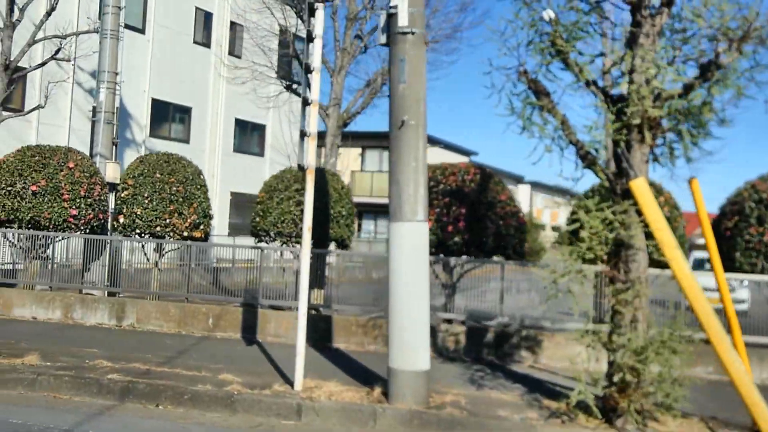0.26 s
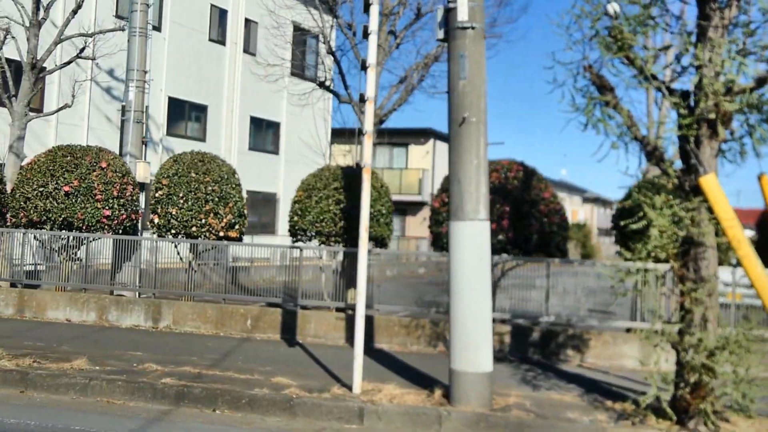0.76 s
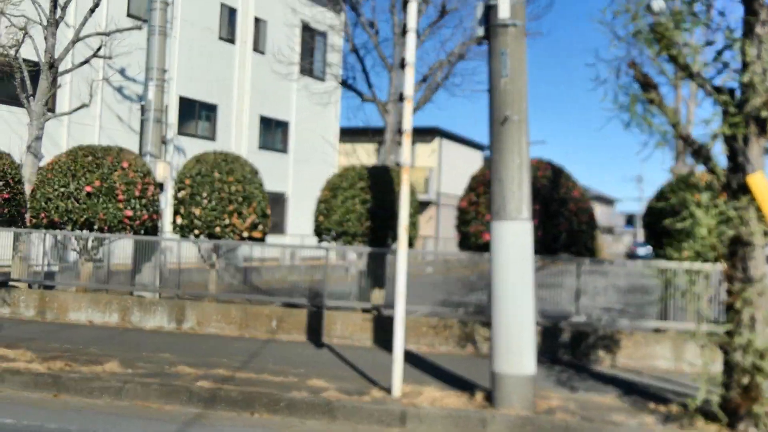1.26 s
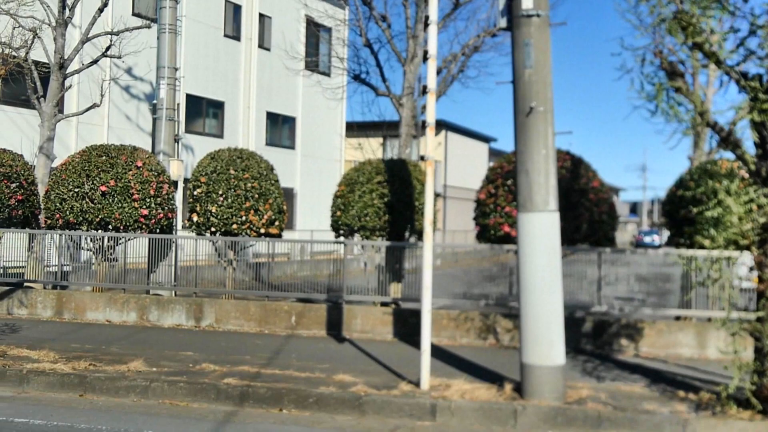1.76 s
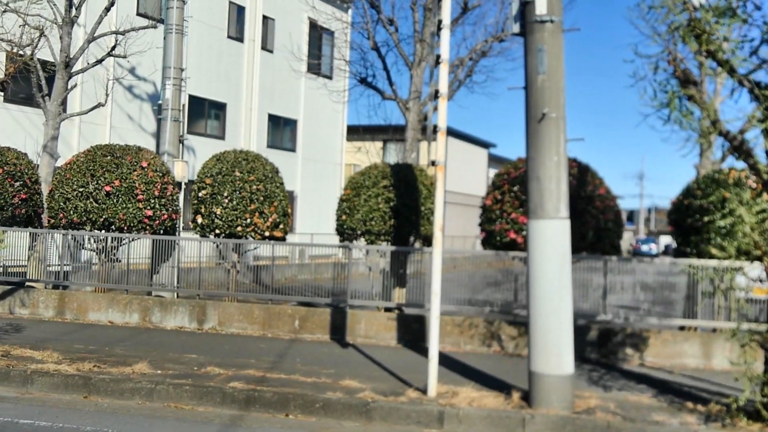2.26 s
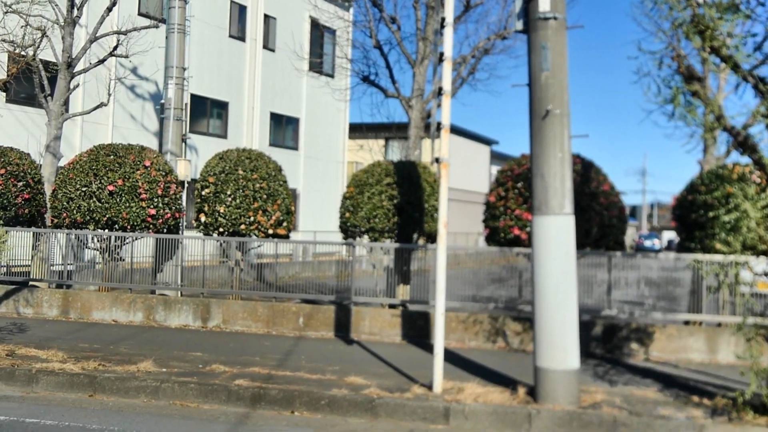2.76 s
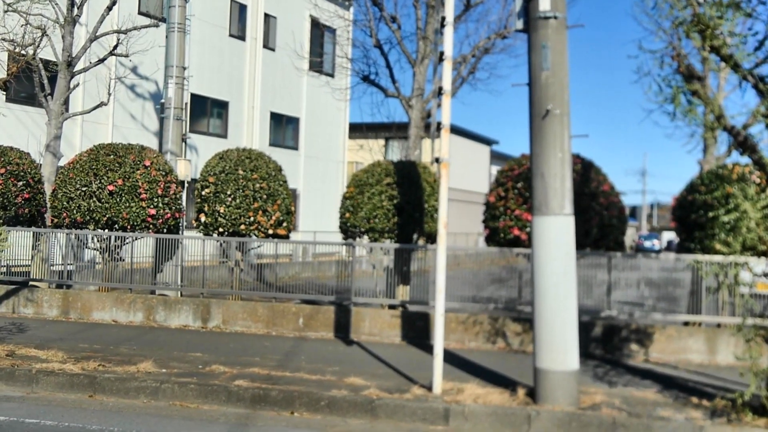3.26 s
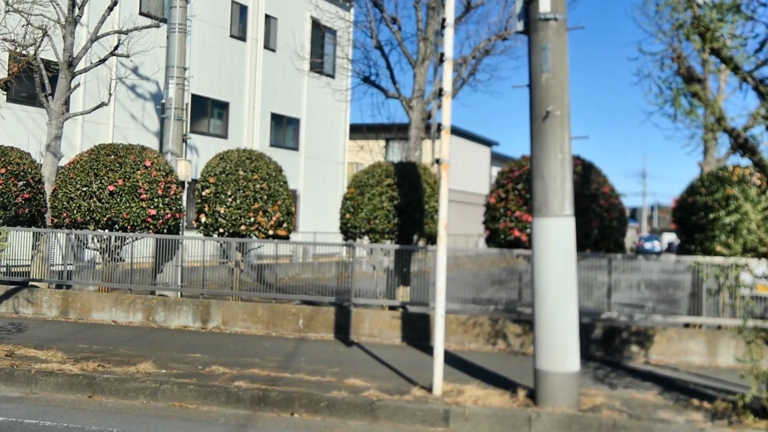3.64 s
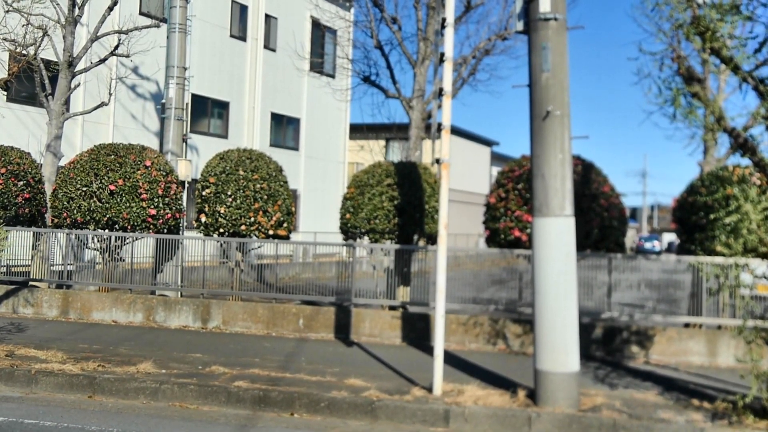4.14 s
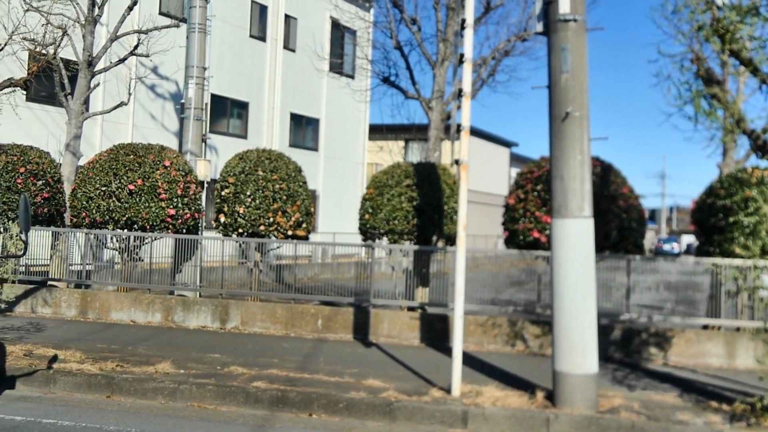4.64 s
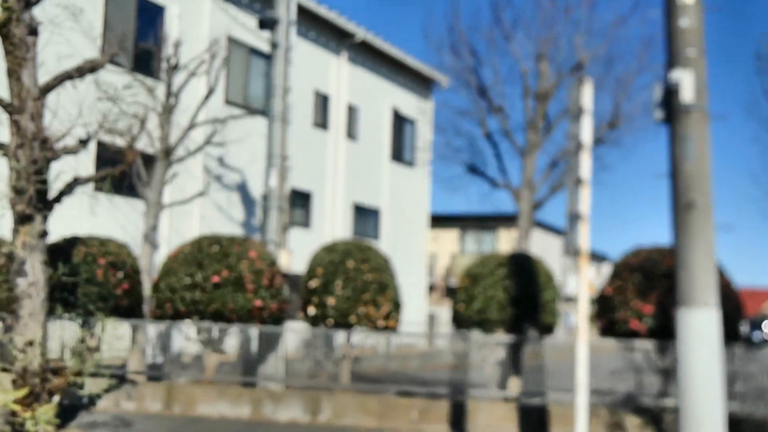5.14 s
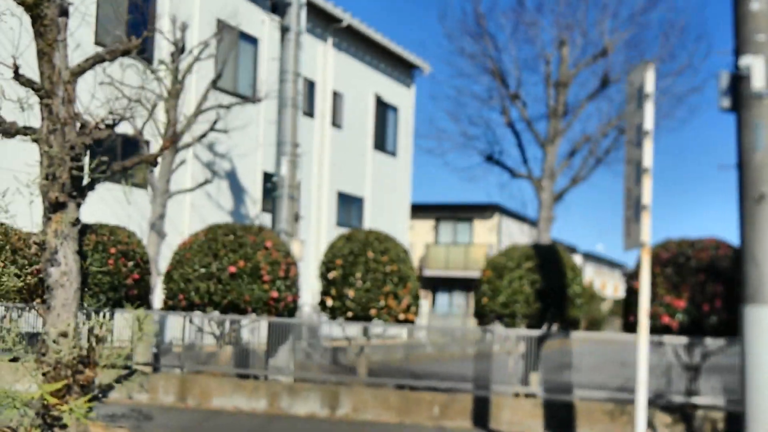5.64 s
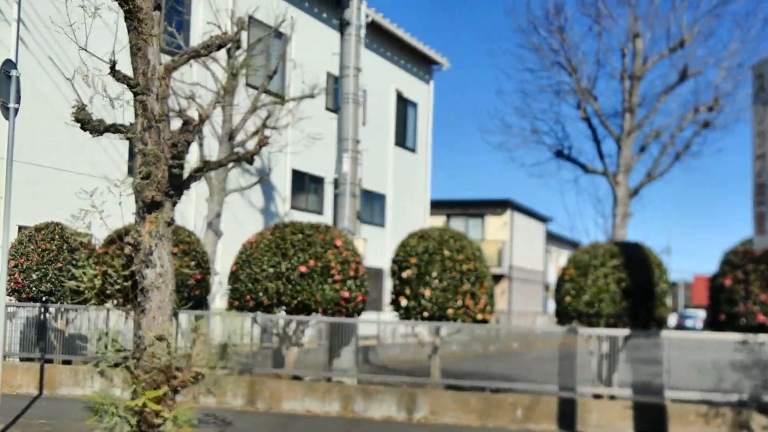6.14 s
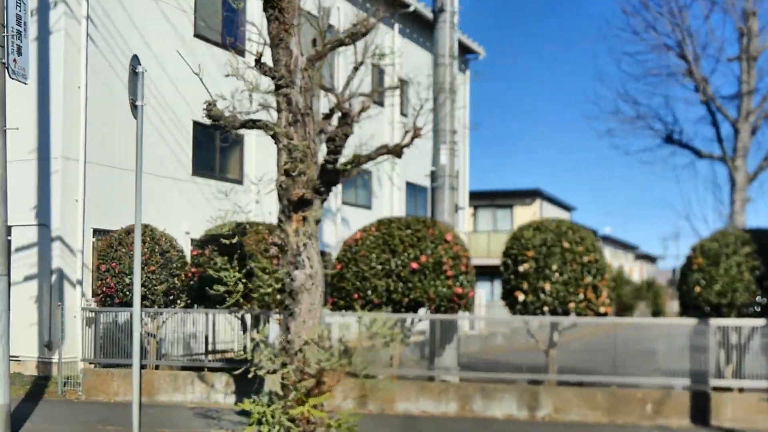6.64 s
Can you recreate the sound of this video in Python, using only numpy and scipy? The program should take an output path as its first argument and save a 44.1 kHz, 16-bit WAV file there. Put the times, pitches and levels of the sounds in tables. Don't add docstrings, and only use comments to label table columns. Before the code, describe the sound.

A bus halts and idles, heard from within: dull, bassy engine hum, soft valve clatter, faint thin air hiss. Brief brake squeaks come early, then paired air puffs, small rattles and passing cars; a stronger puff comes before a longer vehicle roar. A short total silence follows, then a clunk, ticking combustion and a rising, booming diesel pull with brighter hiss, rattles and a late dry snap.

```python
import sys
import numpy as np
from scipy import signal
from scipy.fft import rfft, irfft, next_fast_len
from scipy.io import wavfile

SR = 44100
rng = np.random.default_rng(int(sys.argv[2]) if len(sys.argv) > 2 else 0)


def transcribe(u):
    v = np.clip(np.atleast_2d(u).T, -1, 1)
    q = np.round(v * 32767).astype(np.int16)
    wavfile.write(sys.argv[1], SR, q)


def field_ratio(decibels):
    return 10 ** (np.asarray(decibels, dtype=float) / 20)


N = 303849
T = np.arange(N) / SR
DROPOUT_START_S, DROPOUT_END_S = 5.1712, 5.4167
STANDING = T < (DROPOUT_START_S + DROPOUT_END_S) / 2
LEFT_RIGHT = field_ratio([[0.6], [-0.6]])


def columns(table):
    s, *rest = np.transpose(table)
    return [np.interp(T, s, c) for c in rest]


def on_log_hz(points, hz):
    f, db = np.transpose(points)
    return np.interp(np.log(np.maximum(hz, 1)), np.log(f), db)


def colour(x, points, extra=((1, 0), (2, 0)), size=8192):
    hz = np.arange(size // 2 + 1) * SR / size
    log_gain = np.log(field_ratio(on_log_hz(points, hz) + on_log_hz(extra, hz)))
    cepstrum = irfft(log_gain)
    cepstrum[1:size // 2] *= 2
    cepstrum[size // 2 + 1:] = 0
    response = irfft(np.exp(rfft(cepstrum)))
    return signal.oaconvolve(x, response)[:N]


def band(x, lo_hz, hi_hz):
    sos = signal.butter(2, [lo_hz, hi_hz], "bandpass", fs=SR, output="sos")
    return signal.sosfilt(sos, x)


def walk(rate):
    place = T[::64] * rate + rng.random()
    knots = 1.44 * rng.standard_normal(600)
    k = place.astype(int)
    blend = np.sin(np.pi / 2 * (place - k)) ** 2
    return np.interp(T, T[::64], knots[k] + (knots[k + 1] - knots[k]) * blend)


def swell(at_s, half_s):
    return 1 / (1 + ((T - at_s) / half_s) ** 2) ** 2


# (frequency [Hz], side minus mid [dB])
WIDTH = [(60, -23), (110, -51), (200, -45), (380, -41), (700, -6), (1290, -1.5), (2380, 0), (4400, -1),
         (8120, -1), (15000, -4)]


def wide(points, gate=1):
    lead = 0.33
    common, own = rng.standard_normal((2, N))
    early = irfft(1j * rfft(common, next_fast_len(N)))[:N]
    mid = colour(gate * common, points)
    side = colour(gate * (lead * early + np.sqrt(1 - lead ** 2) * own), points, WIDTH)
    return np.array([mid + side, mid - side]) / np.sqrt(np.mean(mid ** 2))


def cabin(x, t60, wet_db):
    t = np.arange(int(0.3 * SR)) / SR
    tail = rng.standard_normal((2, len(t))) * 1000.0 ** (-t / t60)
    tail *= field_ratio(wet_db) / np.sqrt(np.sum(tail ** 2, axis=1, keepdims=True))
    return x + signal.fftconvolve(x[None], tail, axes=1)[:, :N]


def crank(hz, wander):
    return np.cumsum(hz * (1 + wander * walk(6))) / SR


# (closest approach [s], half length [s], tyre hiss [dB], roar [dB])
PASSING = [
    (.15, 0.17, -84, -55),
    (.42, 0.28, -59.5, -55.5),
    (1.1, 0.29, -62, -58),
    (2.9, 0.074, -63, -56.5),
    (4.33, 0.13, -60.5, -67),
    (4.95, 0.96, -63.5, -50),
]


def passing(column):
    return np.sqrt(sum(field_ratio(2 * row[column]) * swell(*row[:2]) for row in PASSING))


# (frequency [Hz], level [dB per Hz])
ROAR = [(300, -19), (600, -4), (1000, 0), (2500, -9.5), (4500, -18), (8000, -36)]


def traffic_roar():
    return STANDING * passing(column=3) * wide(ROAR, field_ratio(0.67 * walk(11)))


# (frequency [Hz], level [dB per Hz])
HISS = [(2940, -14), (5000, -2.5), (6520, 0.5), (7700, -2.5), (9180, 4.5), (11100, 4), (14600, -8.5),
        (15600, 0.5)]


def leak():
    idle_db, pull_db, refill_db = -68, -57.5, -55.5
    standing = np.hypot(field_ratio(idle_db), passing(column=2))
    refill = field_ratio(2 * refill_db) * np.exp(-np.abs(T - DROPOUT_END_S) / 0.1)
    moving = np.sqrt(field_ratio(2 * pull_db) + refill)
    return np.where(STANDING, standing, moving) * field_ratio(0.59 * walk(8.2)) * wide(HISS)


# (start [s], end [s], start pitch [Hz], end pitch [Hz], level [dB])
WHINES = [
    (0, .6, 1750, 1750, -62),
    (2.38, 2.52, 3130, 3130, -67.5),
    (6.3, 6.7, 1975, 1975, -57),
    (6.18, 6.6, 438, 482, -26),
]


def whines():
    out = 0
    for start, end, start_hz, end_hz, db in WHINES:
        rise = np.sqrt(np.sin(np.pi * np.clip((T - start) / (end - start), 0, 1)))
        hz = np.interp(T, (start, end), (start_hz, end_hz)) * (1 + 0.005 * walk(24))
        out = out + rise * field_ratio(db + 2.5 * walk(27)) * np.sin(2 * np.pi * np.cumsum(hz) / SR)
    return out * LEFT_RIGHT


# (frequency [Hz], level [dB per Hz])
PUFF = [(2650, -22), (4500, 0), (4690, -27), (4990, -6), (5420, -4), (6510, 5), (8050, 0.5), (10200, 5),
        (11600, 0.5), (15600, -12)]
# (time [s], swell [s], hiss [dB], throat [dB], release [dB per s])
PUFFS = [
    (1.79, 0.038, -52, -58, 300),
    (1.855, .012, -62, -58, 260),
    (1.916, 0.017, -46.5, -59, 350),
    (1.96, .022, -47, -52, 300),
    (4.37, 0.032, -41.5, -39.5, 260),
    (6.52, 0.068, -53, -46.5, 138),
]


def puffs():
    attack_s, onset_db = 0.003, -8.5
    turbulence = field_ratio(1.2 * walk(75)) * rng.exponential(size=N) ** 0.53
    hiss = wide(PUFF, turbulence)
    throat = wide([(900, 5.5), (2200, 0), (4800, -4.5), (6500, -14.0)])
    out = 0
    for s, swell_s, hiss_db, throat_db, release_db in PUFFS:
        flow_db = np.interp(T - s, (0, swell_s, swell_s + 1), (onset_db, 0, -release_db))
        flow = np.clip((T - s) / attack_s, 0, 1) * field_ratio(flow_db)
        out = out + flow * (field_ratio(hiss_db) * hiss + field_ratio(throat_db) * throat)
    return out


# (time [s], clack peak [dB], panel ring [dB], low knock [dB], bright tick [dB])
RATTLES = [(0.1034, -56, -59, -29, -70), (0.3815, -39, -58, -30, -62), (0.972, -39, -56, -44, -51),
           (1.7903, -38, -60, -36, -54), (1.8344, -46, -62, -28, -51), (1.8617, -53.5, -47, -25.5, -51),
           (2.3844, -64, -52, -34, -71), (2.8509, -39, -47, -29, -58), (2.8824, -51.5, -47, -29.5, -57),
           (2.9622, -48, -47.5, -25, -52), (2.9946, -58, -60, -28, -64), (3.7392, -52, -62, -45, -59),
           (3.9674, -50, -64, -26, -67), (3.9806, -53, -60, -31, -70), (3.995, -53, -72, -41, -75),
           (5.4924, -34, -40, -20, -45), (6.3579, -49, -53, -28, -57)]
# (time [s], peak [dB], centre [Hz])
SNAPS = [
    (5.4955, -42, 5400),
    (5.4955, -46, 11500),
    (5.702, -47, 5900),
    (6.7325, -37, 4400),
]


def rattles():
    size, panel_hz = 4096, 2320
    out, t = np.zeros(N + size), np.arange(size) / SR
    for s, db, ring_db, low_db, tick_db in RATTLES:
        tap, floor, bright = rng.standard_normal((3, size))
        clack = field_ratio(db - 6.5) * band(tap, 1000, 3000) * 1000.0 ** (-t / 0.07)
        panel = np.sin(2 * np.pi * panel_hz * t) + 6.6 * band(tap, 2150, 2420)
        ring = field_ratio(ring_db - 2) * panel * 1000.0 ** (-t / 0.065)
        thud = field_ratio(low_db + 10.5) * band(floor, 410, 980) * 1000.0 ** (-t / 0.086)
        tick = field_ratio(tick_db + 6.5) * band(bright, 9700, 11200) * 1000.0 ** (-t / 0.07)
        out[int(s * SR):][:size] += clack + ring + thud + tick
    for s, db, hz in SNAPS:
        crack = np.sign(rng.standard_normal(size)) * 1000.0 ** (-t / 0.006)
        out[int(s * SR):][:size] += field_ratio(db + 13) * band(crack, 0.68 * hz, 1.35 * hz)
    return cabin(out[:N], t60=0.22, wet_db=-0.5)


# (time [s], pitch [Hz])
SQUEAL = [(.54, 9630), (.69, 9645), (.75, 9720), (.91, 9740), (1.04, 9685), (1.3, 9570), (1.34, 9530),
          (1.55, 9515), (1.78, 9480)]
# (time [s], length [s], level at start [dB], level at end [dB])
GRABS = [
    (.55, .18, -64, -54),
    (.74, .06, -72, -76),
    (.88, .07, -71, -71),
    (1.025, .165, -63, -59),
    (1.21, .1, -64, -70),
    (1.32, .115, -58, -64),
    (1.46, .045, -68, -67),
    (1.52, .05, -67, -68),
    (1.58, .19, -78, -71),
]


def squeal():
    edge_s = 0.03
    grip = 0
    for s, length_s, start_db, end_db in GRABS:
        end = s + length_s
        edges = np.clip(np.minimum(T - s, end - T) / edge_s + 0.5, 0, 1) ** 2
        grip = grip + edges * field_ratio(np.interp(T, (s, end), (start_db, end_db)))
    hz = columns(SQUEAL)[0] + 6 * walk(60)
    return grip * field_ratio(3 + 2.2 * walk(30)) * np.sin(2 * np.pi * np.cumsum(hz) / SR) * LEFT_RIGHT


# (multiple of firing rate, rms level [dB])
IDLE_ORDERS = [(1.0, -67.8), (2.0, -70.5), (3.0, -54.9), (3.25, -61.3), (3.5, -66.1), (3.75, -49.1),
               (4.25, -51.5), (4.5, -52.3), (4.75, -51.6), (5.0, -53.0), (5.5, -47.0), (6.0, -55.9),
               (6.25, -41.3), (6.5, -35.6), (6.75, -56.3), (7.5, -50.5), (7.75, -53.0), (8.25, -47.8),
               (9.0, -43.3), (9.25, -60.5), (10.0, -58.3), (12.5, -51.5), (13.5, -49.5), (14.5, -58.3),
               (15.75, -61.9), (16.25, -55.1), (16.5, -53.7), (16.75, -55.8), (17.5, -53.3), (17.75, -60.0)]
# (frequency [Hz], level [dB per Hz])
IDLE_BODY = [(15, -55), (25, -31.5), (48, -33.5), (90, -14.5), (139, -7), (162, -3.5), (181, -4),
             (194, -9.5), (226, -10.5), (264, -12.5), (354, -11), (401, -15), (442, -9.5), (494, -21),
             (700, -29), (910, -51.5), (1540, -120)]
# (frequency [Hz], level [dB per Hz])
IDLE_CLATTER = [(290, -40.5), (500, -5), (542, 2), (623, -4), (750, 2.5), (991, -3), (1150, -10),
                (1250, -11.5), (3430, -30), (4380, -34.5), (8000, -42), (10400, -58), (17600, -120)]


def idle():
    firing_hz, rumble_db, clatter_db, sway_db = 26.53, -30.5, -42, 0.4
    turn = crank(firing_hz, wander=0.0016)
    hum = 0
    for k, db in IDLE_ORDERS:
        level = field_ratio(db + 3 + 1.5 * walk(5))
        hum = hum + level * np.sin(2 * np.pi * (k * turn + rng.random()))
    lurch_db = 5 * swell(2.98, 0.07)
    rumble = field_ratio(rumble_db + lurch_db) * wide(IDLE_BODY, field_ratio(sway_db * walk(4.1)))
    gate = (1 + 0.4 * np.exp(-(turn % 1) / 0.15)) * field_ratio(0.5 * walk(20))
    return hum + rumble + field_ratio(clatter_db) * wide(IDLE_CLATTER, gate)


# (time [s], firing rate [Hz], load [dB])
PULL = [(5.43, 35.63, 1.5), (5.8, 36.87, -0.5), (5.9, 39.9, 1), (6.006, 45.08, 1.5), (6.12, 47.78, 2),
        (6.222, 52.1, 1), (6.434, 55.46, 2.5), (6.51, 60.38, 2), (6.67, 62.55, 4), (6.754, 66.3, 1.5),
        (6.89, 67, 0.5)]
# (frequency [Hz], level [dB per Hz])
PULL_BODY = [(15, -62), (25, -36.5), (81, -12), (98, -9.5), (145, 0), (220, -5), (249, -3), (316, -6.5),
             (354, -7), (390, -10.5), (454, -6), (508, -18.5), (700, -23.5), (910, -56), (1540, -120)]
# (frequency [Hz], level [dB per Hz])
PULL_CLATTER = [(290, -14.5), (500, -0.5), (661, -11.5), (759, -2), (883, -6), (1030, -6.5), (1320, -16),
                (1990, -21.5), (2340, -28.5), (4480, -35), (8000, -46.5), (10400, -67), (17600, -120)]
# (frequency [Hz], level [dB per Hz])
KNOCK = [(500, -25), (1200, -3), (2400, 0), (3200, -13), (4500, -15), (7000, -25), (11000, -25),
         (16000, -50)]
# (multiple of firing rate, shell resonance [Hz], width [Hz], level there [dB])
BOOMS = [
    (2, 72, 20, -30),
    (3, 108, 36, -23),
    (4, 255, 170, -19),
    (7, 250, 30, -28),
]


def pull():
    rumble_db, clatter_db, knock_db = -21, -34.5, -48.5
    rumble_db_oct, clatter_db_oct = 3, 2.8
    clatter_load, boom_load = 0.68, 1.34
    order_blur, boom_flutter_db = 0.09, 1.8
    knock_s = 5.494
    clutch_bites_s, knock_fade_db_s = 5.68, 40
    hz, load_db = columns(PULL)
    octaves = np.log2(hz / PULL[0][1])
    turn = crank(hz, wander=0.0033)
    turn = turn - turn[int(knock_s * SR)] + 1000

    orders = 0
    for k in np.arange(1, 9, 0.5):
        if k in (3, 4):
            continue
        uneven_db = -7 * (k % 1 > 0) + 3 * walk(9)
        phase = k * turn + rng.random() + order_blur * walk(16)
        orders = orders + field_ratio(on_log_hz(PULL_BODY, k * hz) + uneven_db) * np.sin(2 * np.pi * phase)

    boom = 0
    for k, shell_hz, width_hz, db in BOOMS:
        resonance = 1 / np.hypot(1, 2 * (k * hz - shell_hz) / width_hz)
        phase = k * turn + order_blur / 2 * walk(16)
        boom = boom + field_ratio(db + boom_flutter_db * walk(14)) * resonance * np.sin(2 * np.pi * phase)

    rumble = wide(PULL_BODY, field_ratio(1.3 * walk(13))) + 0.6 * orders
    rumble = field_ratio(rumble_db + rumble_db_oct * octaves + load_db) * rumble
    clatter = wide(PULL_CLATTER, field_ratio(0.61 * walk(15)))
    clatter = field_ratio(clatter_db + clatter_db_oct * octaves + clatter_load * load_db) * clatter
    strength = field_ratio(1.8 * rng.standard_normal(2000)[turn.astype(int)])
    burst = strength * np.exp(-(turn % 1) / hz / 0.007)
    fade_db = knock_fade_db_s * np.clip(T - clutch_bites_s, 0, 1)
    knock = field_ratio(knock_db - fade_db) * wide(KNOCK, burst)
    return field_ratio(boom_load * load_db) * boom + rumble + clatter + knock


def scene():
    engine = np.where(STANDING, idle(), pull())
    return traffic_roar() + leak() + whines() + puffs() + rattles() + squeal() + engine


def roll_off(x):
    return signal.sosfilt(signal.butter(12, 15500, fs=SR, output="sos"), x)


# (frequency [Hz], left minus right [dB])
TILT = [(60, 0.1), (110, -0.5), (200, -0.06), (380, -1), (700, 1.5), (1290, 4.5), (2380, 3.5), (4400, -0.5),
        (8120, 0.5), (15000, -1.5)]


def record(dry):
    notch_hz, notch_width_hz, top_hz = 7770, 135, 15250
    hz, db = np.transpose(TILT)
    x = np.array([colour(c, np.c_[hz, way * db / 2]) for c, way in zip(dry, (1, -1))])
    notch = signal.iirnotch(notch_hz, notch_hz / notch_width_hz, SR)
    x = signal.lfilter(*notch, signal.lfilter(*notch, x))
    before = np.clip((DROPOUT_START_S - T) / 0.00042, 0, 1)
    after = np.clip((T - DROPOUT_END_S) / 0.00095, 0, 1)
    x = np.tanh(0.7 * x * (before + after)) / 0.7
    mix = signal.sosfilt(signal.ellip(8, 0.3, 60, top_hz, fs=SR, output="sos"), x)
    return roll_off(mix)


dry = scene()
out = record(dry)
transcribe(out)
```